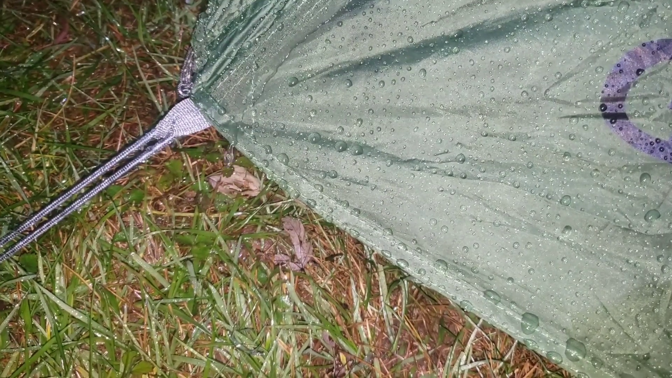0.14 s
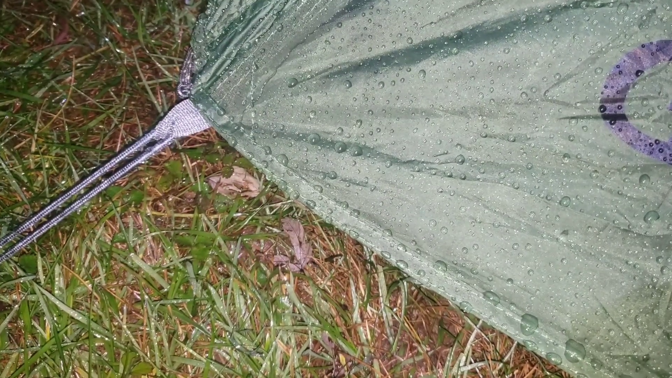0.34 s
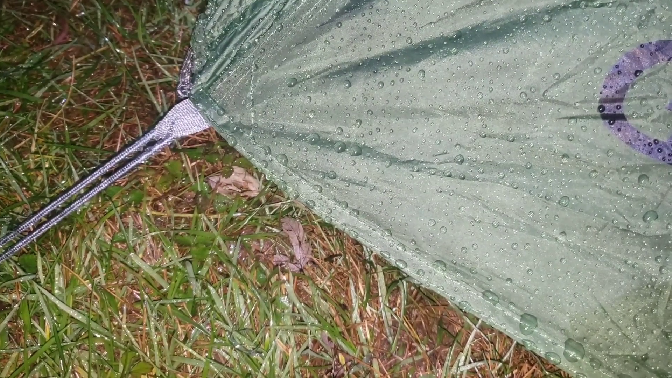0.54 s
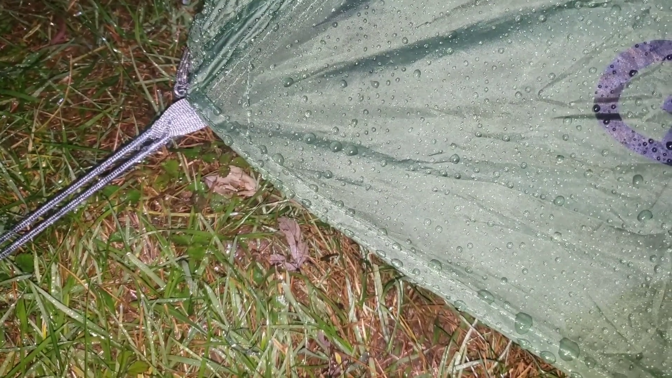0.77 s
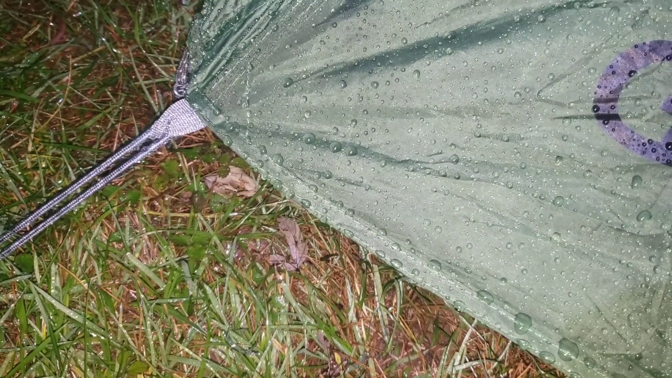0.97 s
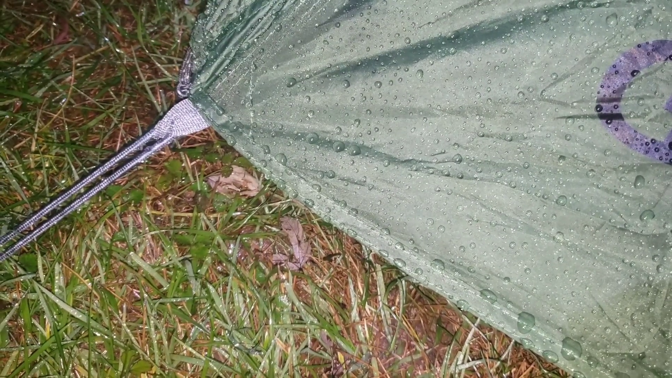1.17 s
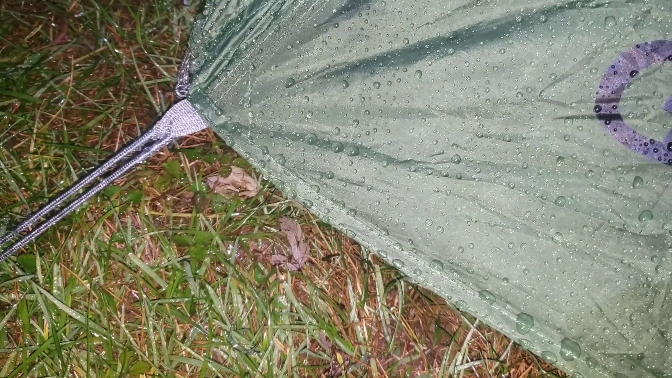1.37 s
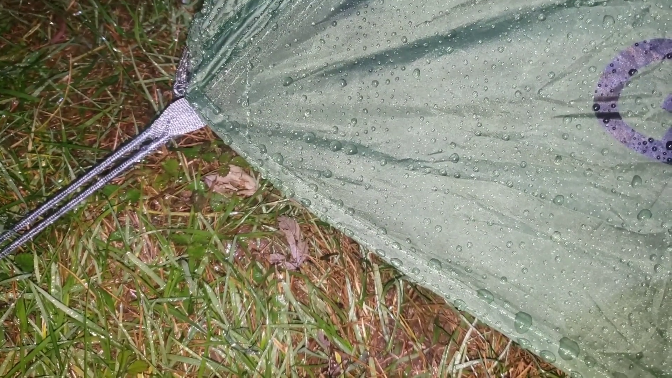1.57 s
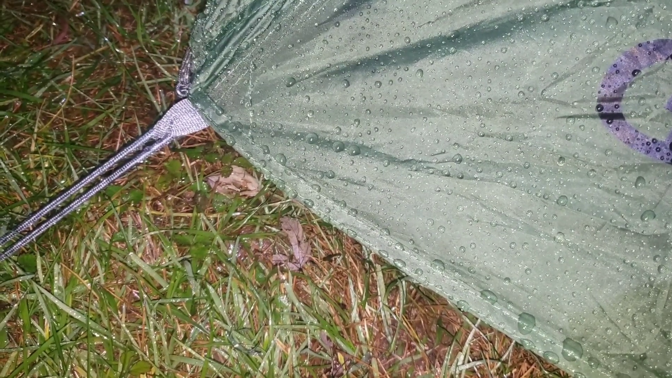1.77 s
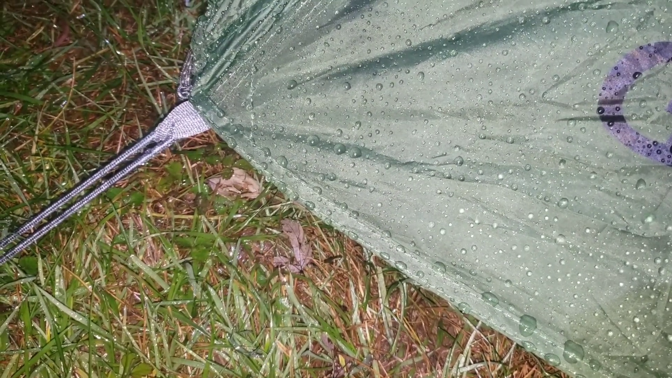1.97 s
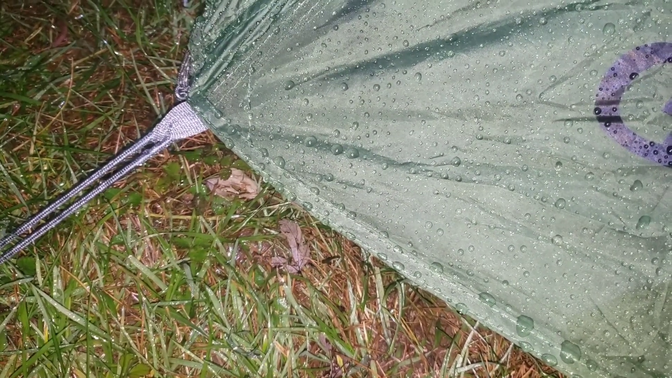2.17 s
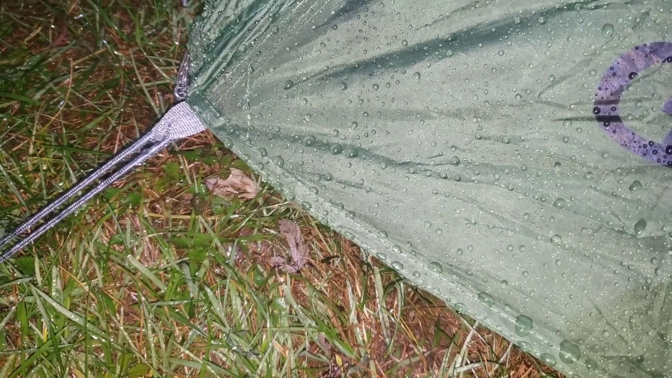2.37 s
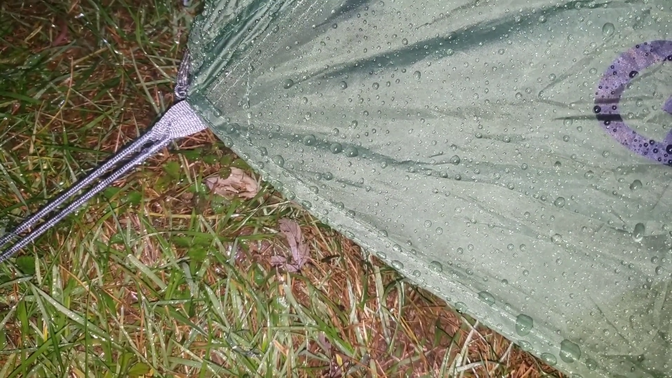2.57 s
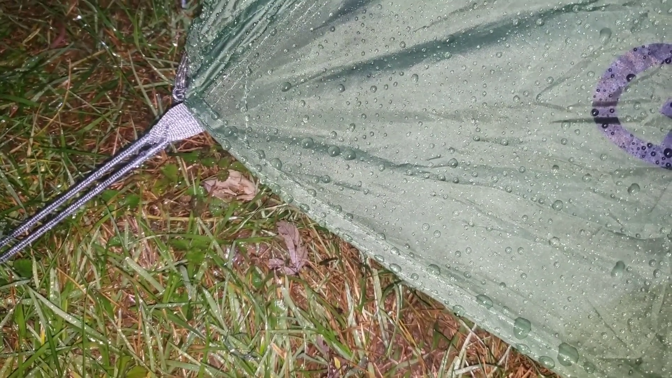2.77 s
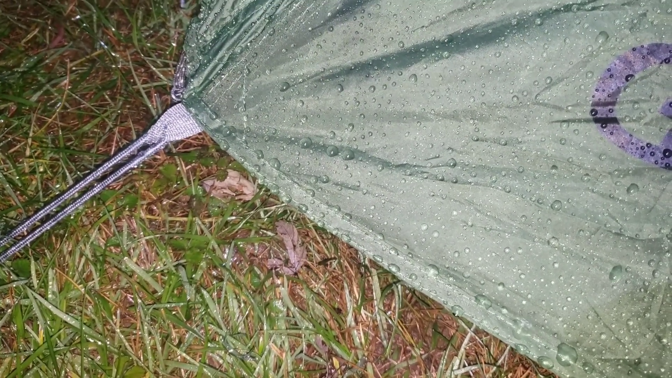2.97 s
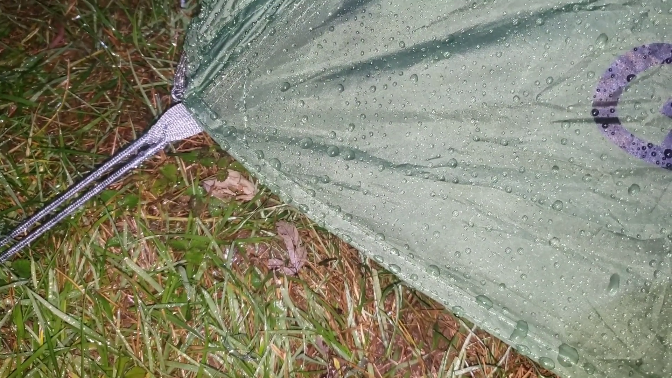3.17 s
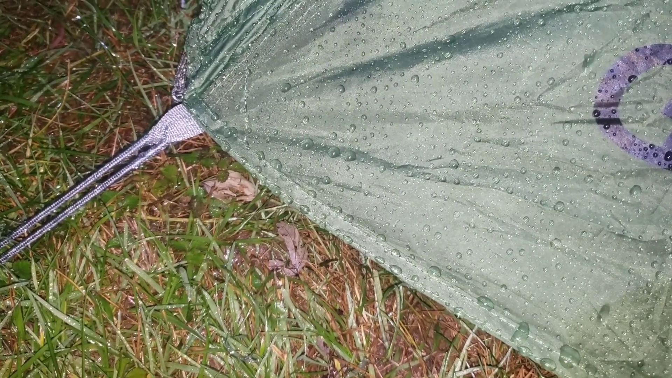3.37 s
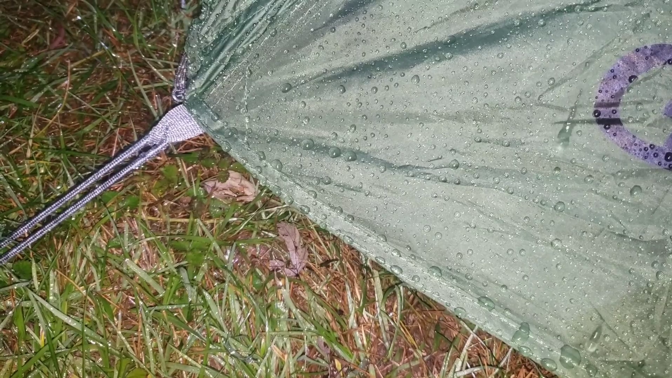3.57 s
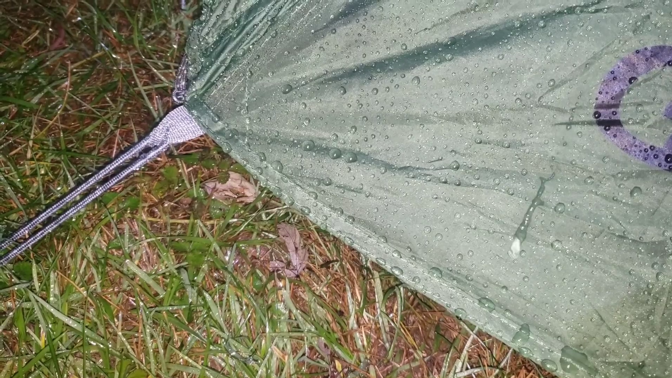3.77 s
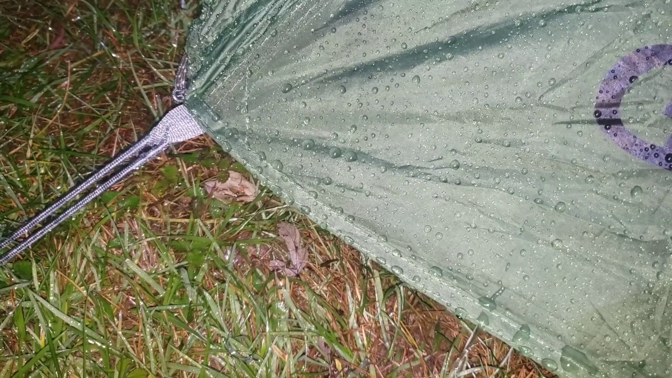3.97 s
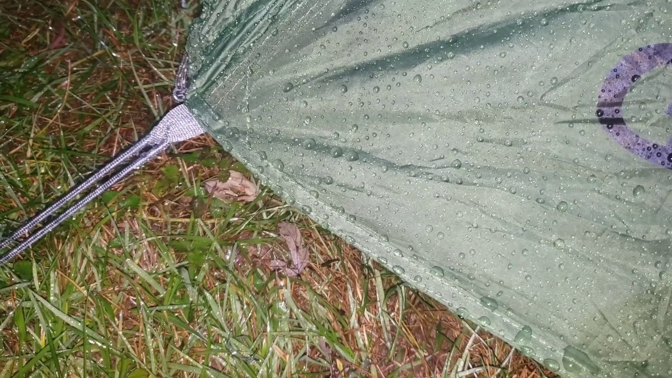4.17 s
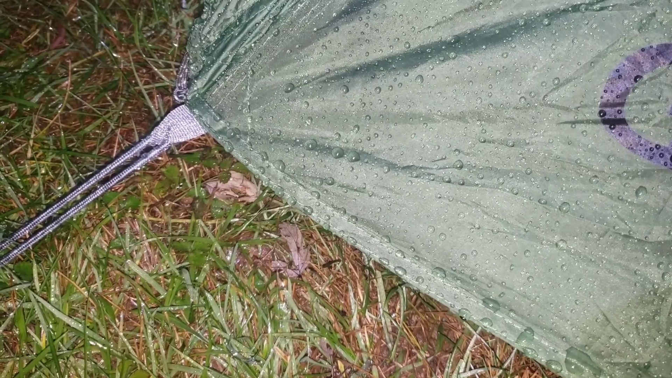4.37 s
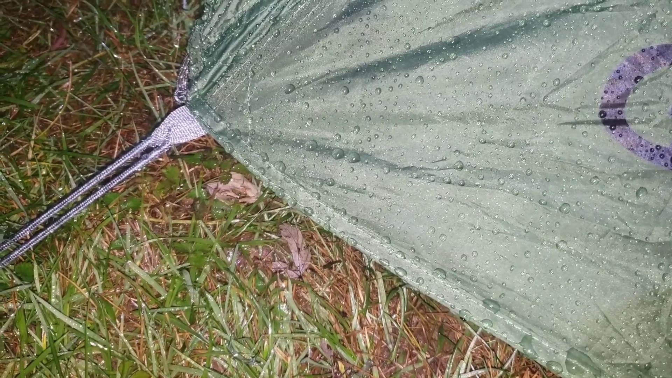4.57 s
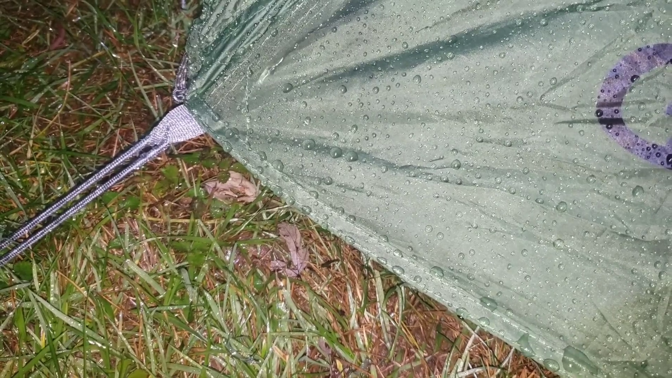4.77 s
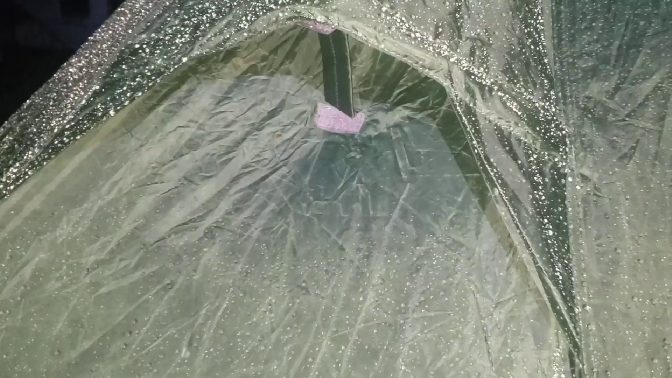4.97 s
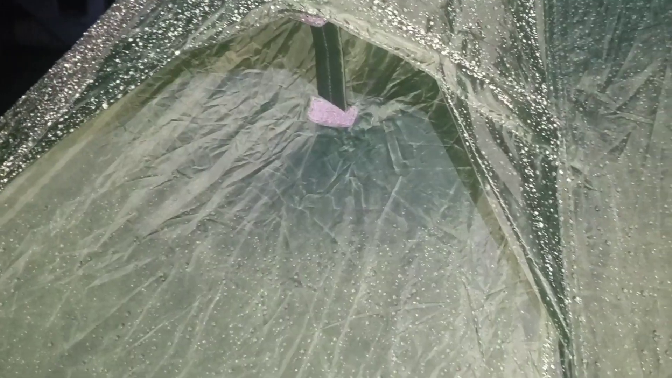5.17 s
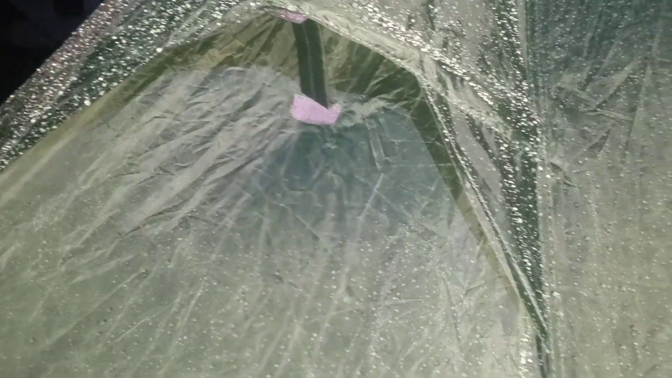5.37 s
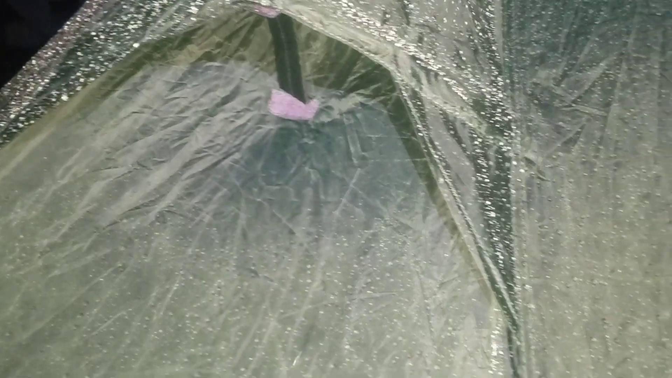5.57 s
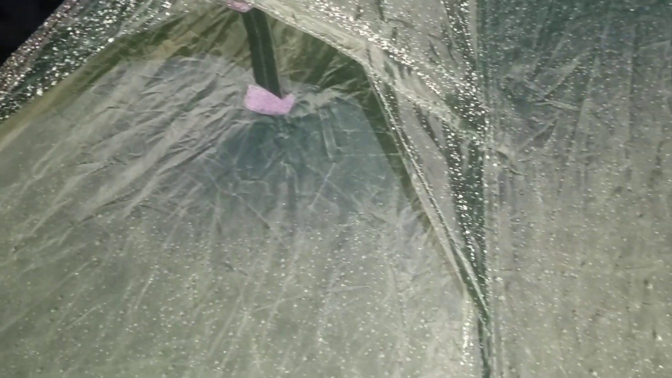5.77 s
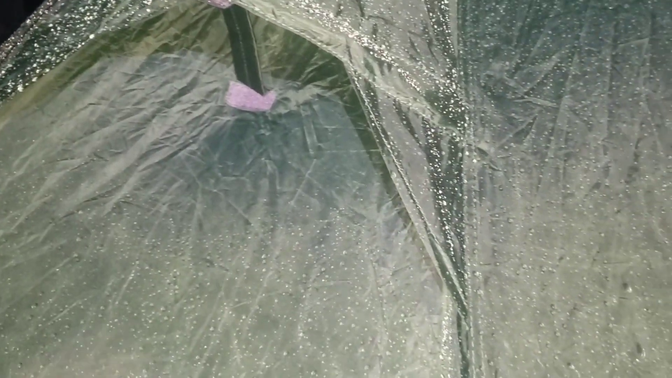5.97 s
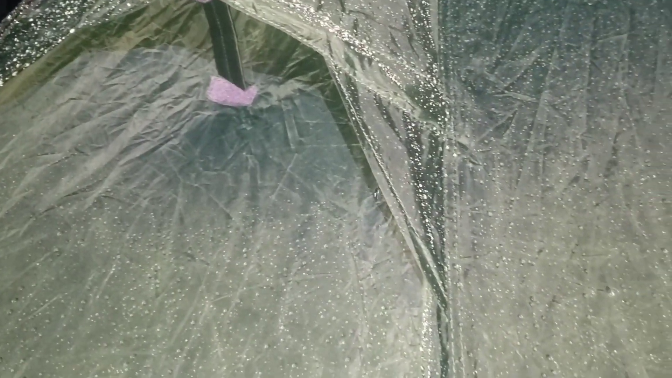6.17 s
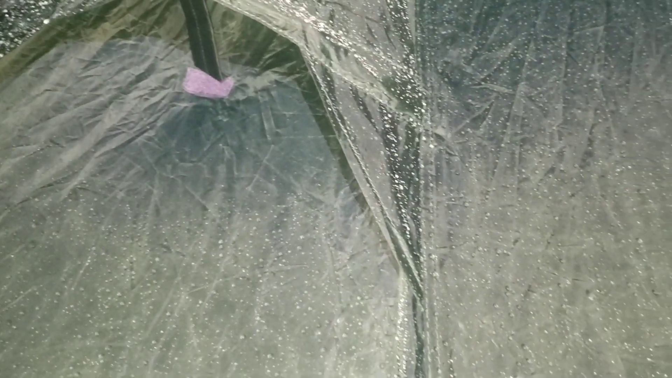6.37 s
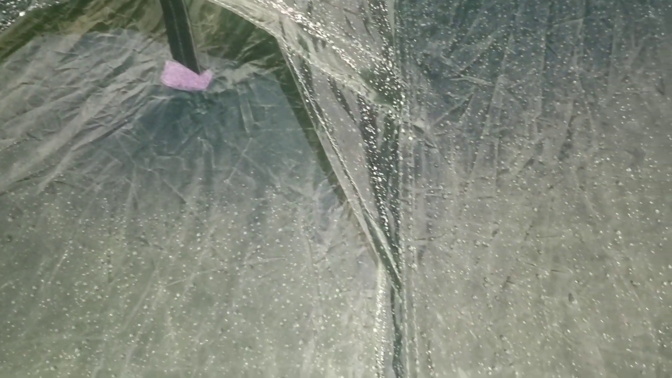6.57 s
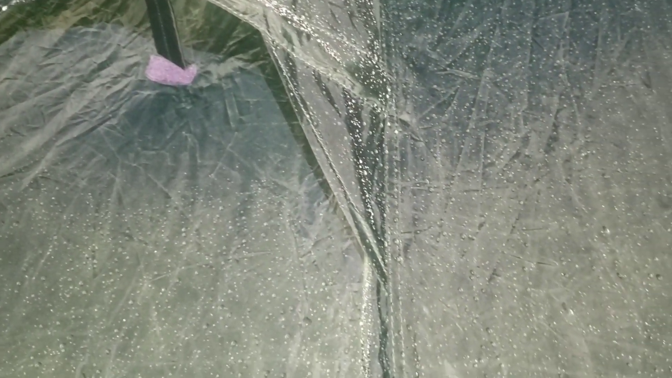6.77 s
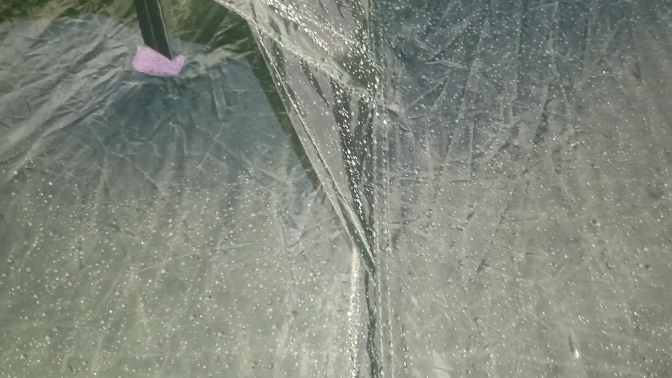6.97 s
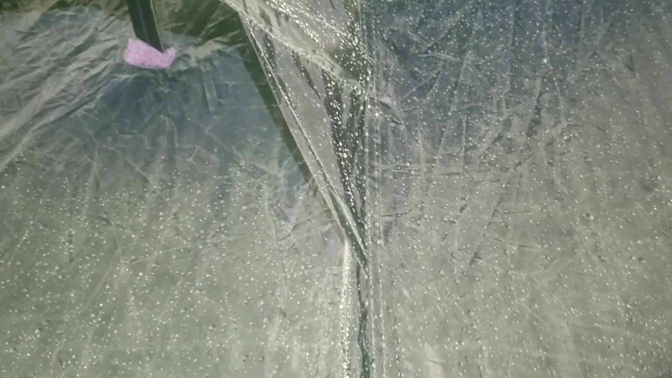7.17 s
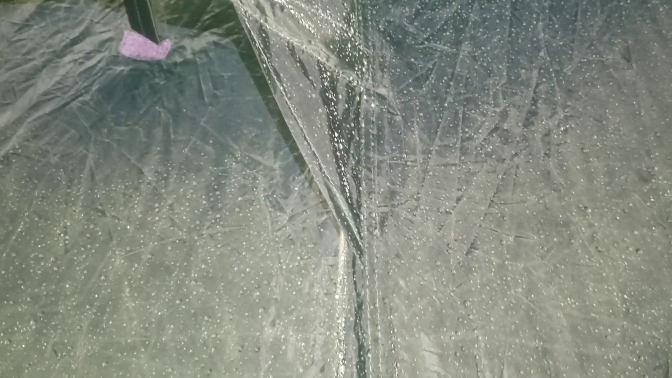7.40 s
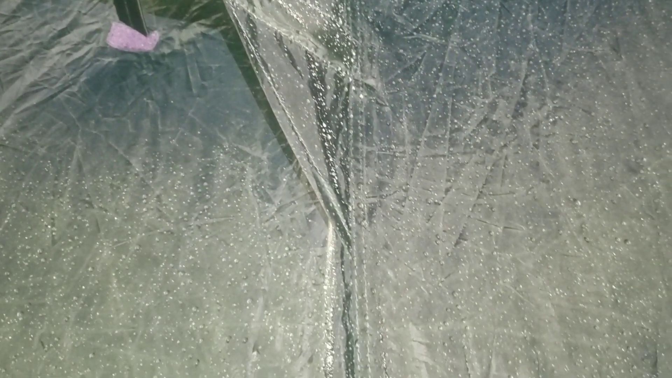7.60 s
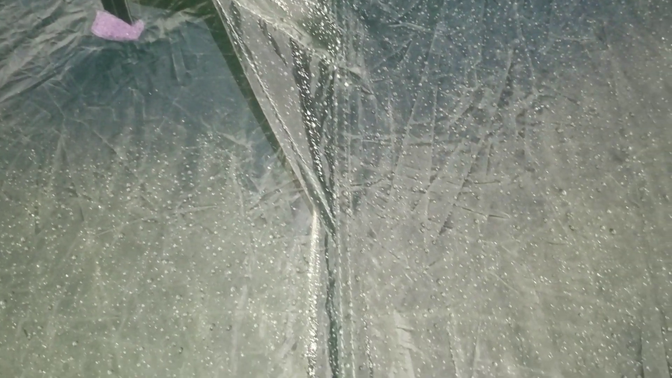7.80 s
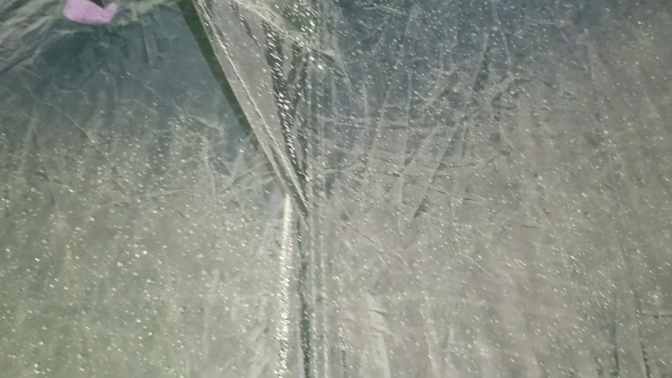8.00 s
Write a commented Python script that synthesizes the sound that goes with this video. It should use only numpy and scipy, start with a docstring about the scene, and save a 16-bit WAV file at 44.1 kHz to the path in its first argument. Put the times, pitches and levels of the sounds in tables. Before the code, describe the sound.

From the start, rain patters steadily on a taut tent outdoors, very close to the microphone and leaning to the right. Each drop makes a short snap with a hollow pock and a slight thud. Small drops come in loose flurries, while bigger ones land irregularly, several each second. The sharpest hits come at about 0.6 seconds and as a quick pair around 2 seconds. Behind them, distant rain makes an even hiss over a faint low rumble. At about 4.8 seconds the sound drops out for an instant. It returns at once, louder and busier, with stronger small drops and a fuller hiss. Heavy drops cluster between 5 and 6 seconds and again around 6.5 seconds, and the dense pattering carries on until the end at about 8 seconds.

```python
"""Night rain patters on a taut tent fly, close to a small camera with two microphones.
Each drop snaps the cloth, which rings with a hollow pock, rustles for a few ms and thuds a little longer.
Big drops land nearest, among flurries of small ones; distant rain hisses behind, over a faint rumble.
The sound drops out for an instant when the camera moves to a busier spot on the fly."""
import sys
import numpy as np
from scipy import signal
from scipy.fft import rfft, irfft
from scipy.io import wavfile

SR = 44100
rng = np.random.default_rng(int(sys.argv[2]) if len(sys.argv) > 2 else 0)


def inscribe(sig):
    """Save sig as 16-bit PCM at rate SR to the path in sys.argv[1].

    A 1-D sig is mono; a 2-D sig holds one channel per row.
    Samples are clipped to [-1, 1] before scaling.
    """
    pcm = np.round(np.clip(np.atleast_2d(sig).T, -1, 1) * 32767)
    wavfile.write(sys.argv[1], SR, pcm.astype(np.int16))


N = 354563

# Big drops close to the microphones; thud, knock, sizzle and splash are relative to the tick.
# start_s, tick_db, thud_db, knock_db, sizzle_db, splash_db, pock_hz
NEAR_DROPS = [(0.2191, -50.5, -1, -2.0, -9, -19, 890), (0.2648, -52, 1.5, -13.0, 4, -24.0, 635),
              (0.278, -49.0, -3, -4, -15, -11.5, 580.0), (0.3373, -72.5, 18, -1, 7, 4, 610.0),
              (0.4975, -48.5, 0, -4.0, -9, -26, 610.0), (0.5816, -38.5, -3.5, -5, -6, -38, 660),
              (0.615, -49.5, 5, 1, 1, -25.0, 585), (0.6552, -48, 5.0, 0, -4, -17, 660),
              (0.7169, -64, 4, 0, 9, 3.0, 850.0), (0.8971, -51.0, 4.5, -12.0, 2.5, -27, 484),
              (0.9836, -64, 14, 17, -11.0, -26, 850), (1.0184, -50.5, 3.5, -5, 1.5, -22.0, 616),
              (1.2705, -53.5, 3.5, -2, 1, -20, 490.0), (1.408, -63.5, 13.5, 3, -7, -26, 810),
              (1.5462, -61, 11, 1, 13.0, -13.0, 590.0), (1.8982, -47, 8, -16, -1, -29, 550),
              (1.906, -49, 3.5, -14, 0, -27.0, 620.0), (1.9839, -34.5, -0.5, -10, -24, -24.5, 600),
              (2.0098, -30.5, -2, -10, -5, -27.0, 560), (2.051, -44.5, -5, -3.0, -19.0, -34, 460.0),
              (2.176, -52, 7.5, -3, -1, -20, 530.0), (2.3139, -68.5, 8, 18.0, 0, -5.0, 820.0),
              (2.5267, -51, 3, -4, -7, -26, 430.0), (2.557, -58, -2, 4.5, -2, -11, 650.0),
              (2.578, -59.5, 15.5, -10.0, -6, -20.0, 685), (2.772, -54, 2, 3.5, -14, -23.0, 774),
              (2.9159, -48.5, -0.5, -0.5, -13, -19, 870), (3.0089, -45, -1, 4, 5, -18.0, 820),
              (3.256, -49, 6, -3, 11.5, -27, 586), (3.3975, -53, -2.5, -1.0, 0, -15, 880),
              (3.456, -44, -3.5, -10, 1.5, -21, 730), (3.5777, -56, 7.5, 4, -1, -21.0, 742),
              (3.626, -63, 14, 7, 2.0, -12, 660), (3.7841, -55.5, -1, -2.0, 1.0, -17, 640.0),
              (3.8345, -58, 7, -2, 4.0, -22.0, 540.0), (3.9916, -58.5, 7.5, -4, 3.5, -26.0, 584),
              (4.2598, -54.5, 11.0, -3, -0.5, -26, 550.0), (4.46, -57, -3, 3, 8, -37.0, 660.0),
              (4.6678, -48, 0, -6, -4.0, -28, 560), (4.7593, -41, -4.5, -10, -6.5, -26, 666),
              (4.871, -53, -7, -13.0, 0, -16, 497), (4.9126, -50.5, -2, 5.5, 11.5, -9.5, 990),
              (5.0955, -42.5, 1, -16.0, -10, -30, 460.0), (5.124, -49.5, -7.0, -1, -1, -26, 540.0),
              (5.1356, -60.5, 15.5, -4.0, 13.5, -16.0, 580), (5.1854, -45.5, 4, -2, -5.5, -22, 545),
              (5.2672, -43.5, -5, -5.5, -8, -29, 580.0), (5.291, -55.5, 13.5, -12, 4, -19.0, 580),
              (5.5972, -41, -2.5, -21, -23, -35, 420.0), (5.7552, -47.5, 2, 5.0, 2.5, -34, 606),
              (5.7683, -42, -0.5, -17, -13, -38, 540.0), (5.8333, -47.5, 2.5, -4, -22, -24, 630.0),
              (5.8778, -63.5, 17.5, 15.5, 13, -25.0, 670.0), (5.914, -58.5, 12, -6.0, 11.5, -28, 450.0),
              (5.9268, -40, 5.5, -15.0, -10, -32, 427), (6.2162, -45.5, 1.5, -7, -4, -33, 580),
              (6.326, -65, 19.5, -5, 16.5, -15, 580.0), (6.3613, -52, 5, -17, 2.0, -19, 516),
              (6.3793, -54.5, 16, 9.0, -11.0, -25.0, 660), (6.429, -51.5, 6, 2.5, -1, -26, 560.0),
              (6.441, -57, 15.5, -8.0, -12.0, -28.0, 587), (6.4994, -42, 2.5, -19, -11, -28.0, 520.0),
              (6.5268, -46.5, 1, 0, -10, -25.0, 640.0), (6.5613, -37.5, -5.0, -0.5, 0.5, -39, 680.0),
              (6.603, -48, 0, -1.0, -3.0, -20, 604), (6.6347, -57.5, 13, -12, 11.5, -25, 460.0),
              (6.6834, -52.5, 3.5, -5.0, 0, -27, 820), (6.9235, -50.5, 10.5, -1, -13, -25, 423),
              (6.994, -48.5, 2.0, -11, 3.5, -26, 540.0), (7.2164, -43, -5, -1, -15, -20, 730.0),
              (7.2193, -48, -9, -6, -14, -25.0, 600.0), (7.2238, -52, 6.5, -13, 1.0, -32.0, 600.0),
              (7.3461, -51.0, 9, -11.0, -6, -35, 520.0), (7.3688, -51, 7.5, 6, -25, -39, 780),
              (7.5437, -54, 18, 9, 8, -19, 523), (7.5874, -46, 3.5, -16, -4.0, -27, 624),
              (7.6125, -45.5, 4.5, 1, -8.0, -27, 510.0), (7.8297, -44.5, -2, -3, -18.0, -26.0, 830),
              (7.8353, -49, -15, -9, -8, -31, 670.0), (7.9164, -69, 10.5, -3, 5, 3.5, 674),
              (8.0247, -49, 8, -13, 5.5, -20, 460.0)]
# Rise and fall of the small drops and the distant rain: time_s, level_db
RAIN_LEVEL = [(0.0, -56), (0.83, -53.5), (1.01, -57.5), (1.75, -54), (4.78, -55.5), (4.85, -50),
              (6.16, -50.5), (6.4, -48.5), (7.88, -50.5), (8.04, -48)]
# Response of each microphone in its housing: frequency_hz, gain_db
LEFT_RESPONSE = [(30, -50), (50, -23), (100, -23.5), (170, -6), (400, -4.5), (1000, 6), (1750, -3),
                 (2300, -6), (4100, -1), (5600, -23.5), (7300, -27.5), (9200, -20.5), (12000, -23),
                 (15800, -38)]
RIGHT_RESPONSE = [(30, -27), (50, -36), (200, -5.5), (620, -0.06), (1500, -5), (2500, -2), (3050, -1),
                  (3250, -7.5), (3450, -8), (4700, -6), (6200, -22.5), (8500, -48.5), (9500, -43.5),
                  (12500, -38.5), (15800, -60)]
# The six bands of one impact: low_hz, high_hz, tail_over_snap_db, shared_fraction, gain_db
# (at a shared_fraction of 1 or more, both microphones hear the same tail)
BOOM_BAND = (48, 250, 9.2, 1.1, 34)
THUD_BAND = (237, 1035, 2.5, 0.94, 34)
KNOCK_BAND = (1098, 2383, -0.5, 0.36, 42.5)
TICK_BAND = (2587, 3398.5, -0.5, 0.44, 40.5)
SIZZLE_BAND = (3498, 6598, 0, 1.14, 42)
SPLASH_BAND = (8240, 20000, 0.43, 0.034, 63.6)
BANDS = (BOOM_BAND, THUD_BAND, KNOCK_BAND, TICK_BAND, SIZZLE_BAND, SPLASH_BAND)
# Decay of each band, as the wet cloth damps the treble first: t60_s
BAND_T60_S = (.050, .016, .012, .012, .010, .008)
# Slope of each band, gentle where they must add up to one sharp snap: filter_order
BAND_ORDERS = (2, 1, 1, 1, 1, 3)
# Furthest a small drop rises over its usual level in each band: cap_db
SMALL_DROP_CAP_DB = (14.5, 16, 11.9, 15.4, 20.1, 16.7)

MOVE_S = 4.8  # the camera moves; the four pairs below are (before, after)
LEFT_LAG_S = (.00032, .00003)  # how much later the left microphone hears a drop
PAN_DB = (-9.5, -8.5)  # left minus right
BOOM_TRIM_DB = (-1.5, -7.5)
SPRAY_DB = (3, -2)  # top treble of the small drops and distant rain


def near_drops():
    """The big drops that land nearest, each with its own weight of thud, knock, sizzle and splash."""
    start_s, tick_db, thud_db, knock_db, sizzle_db, splash_db, pock_hz = np.transpose(NEAR_DROPS)
    hardness_db = tick_db + thud_db + 49
    boom_db = thud_db + at_spot(start_s, BOOM_TRIM_DB) - 0.17 * hardness_db  # hard hits boom less
    colour_db = np.array([boom_db, thud_db, knock_db, np.zeros_like(start_s), sizzle_db, splash_db])
    sharpness = np.ones_like(start_s)
    return start_s, tick_db + colour_db, sharpness, pock_hz


def small_drops(count=1700, flurry_step_s=.045):
    """Drops over the whole fly, in loose flurries: many faint, few strong, each its own colour."""
    when, size_rank = rng.random((count, 2)).T
    start_s = when * N / SR
    knots_s = np.arange(0, N / SR + 1, flurry_step_s)
    flurry_db = 3.44 * np.interp(start_s, knots_s, rng.standard_normal(len(knots_s)))
    size_db = -5.2 * np.log(size_rank) + flurry_db
    boom, thud, knock, tick, sizzle, splash = rng.standard_normal((count, 6)).T
    colour_db = np.array([5.8 * thud + 6.3 * boom, 5.5 * thud, 6.0 * knock,
                          5.4 * tick, 5.5 * sizzle, 6.8 * splash])
    rise_db = np.minimum(size_db + colour_db, np.array(SMALL_DROP_CAP_DB)[:, None])
    usual_db = (-12.5 + at_spot(start_s, BOOM_TRIM_DB), -16.0, -18.5,
                -22.0, -22.5, -45.0 + at_spot(start_s, SPRAY_DB))
    rain_db = np.interp(start_s, *np.transpose(RAIN_LEVEL))
    band_db = [rain_db + usual + rise for usual, rise in zip(usual_db, rise_db)]
    sharpness = np.full(count, .85)  # further off, the snap softens and the rustle remains
    pock_hz = 620 * 2 ** (.3 * rng.standard_normal(count))
    return start_s, band_db, sharpness, pock_hz


def fly_impacts(start_s, band_db, sharpness, pock_hz, cloth_top_hz=8250):
    """Each drop snaps the fly inward and leaves it rustling and ringing, nearer one microphone."""
    lag_s = at_spot(start_s, LEFT_LAG_S) + .00015 * rng.standard_normal(len(start_s))
    arrival_s = np.array([start_s + lag_s / 2, start_s - lag_s / 2])
    onsets = np.clip((arrival_s * SR).astype(int), 0, N - 1)
    pan_db = at_spot(start_s, PAN_DB) + 2 * rng.standard_normal(len(start_s))
    side_db = np.array([pan_db, -pan_db]) / 2
    parts = []
    for row, t60_s, order, level_db in zip(BANDS, BAND_T60_S, BAND_ORDERS, band_db):
        low_hz, high_hz, tail_db, shared, gain_db = row
        strength = undb(level_db + gain_db + side_db)
        snap = band(impulses(onsets, strength * sharpness), low_hz, high_hz, order)
        tail = undb(tail_db) * cloth_rustle(impulses(onsets, strength ** 2), t60_s, shared)
        parts.append(band(tail, low_hz, high_hz, max(order, 2)) - snap)
    *cloth, splash = parts
    thud_strength = undb(band_db[1] + THUD_BAND[-1] + side_db)
    pock = cloth_pock(onsets, pock_hz, undb(-8) * thud_strength * sharpness)
    cloth_lowpass = signal.butter(4, cloth_top_hz, fs=SR, output="sos")
    return signal.sosfilt(cloth_lowpass, sum(cloth) + pock) + splash


def cloth_rustle(energy, t60_s, shared):
    """Each snap leaves its energy in the cloth, where it leaks away as noise."""
    retained = undb(-60 / (t60_s * SR)) ** 2
    stored = signal.lfilter([1 - retained], [1, -retained], energy)
    shared = np.clip(shared, 0, 1)
    common = np.sqrt(shared) * at_both_mics(rng.standard_normal(N))
    separate = np.sqrt(1 - shared) * rng.standard_normal((2, N))
    return np.sqrt(stored) * (common + separate)


def cloth_pock(onsets, pitch_hz, strength, decay_s=.0014, length=512):
    """Each drop rings its patch of taut cloth for a cycle or two, at a pitch of its own."""
    t = np.arange(length) / SR
    ring = -np.sin(2 * np.pi * pitch_hz[:, None] * t) * np.exp(-t / decay_s)
    ring /= np.linalg.norm(ring, axis=1, keepdims=True)
    return impulses(onsets[..., None] + np.arange(length), strength[..., None] * ring)


def distant_rain():
    """Rain on grass and further cloth merges into a hiss; both microphones share its low end."""
    t = np.arange(N) / SR
    level_db = np.interp(t, *np.transpose(RAIN_LEVEL)) + 7.0
    pan_db = at_spot(t, PAN_DB)
    low = band(at_both_mics(rng.standard_normal(N)), 96, 654)
    hiss = band(rng.standard_normal((2, N)), 657, 8900)
    spray = undb(at_spot(t, SPRAY_DB) - 0.3) * band(rng.standard_normal((2, N)), 9100, 17000)
    return undb(level_db + np.array([pan_db, -pan_db]) / 2) * (low + hiss + spray)


def rumble():
    """A faint steady rumble, different at each microphone."""
    return undb(-41) * band(rng.standard_normal((2, N)), 16, 87)


def microphone(x, response, size=4096):
    """One housed microphone colours the sound: a minimum-phase filter, built from the cepstrum."""
    frequency_hz, gain_db = np.transpose(response)
    grid_hz = np.maximum(np.arange(size // 2 + 1) * SR / size, 1)
    gain = undb(np.interp(np.log(grid_hz), np.log(frequency_hz), gain_db))
    cepstrum = irfft(np.log(gain))
    cepstrum[1:size // 2] *= 2
    cepstrum[size // 2 + 1:] = 0
    return signal.oaconvolve(x, irfft(np.exp(rfft(cepstrum))))[:N]


def at_both_mics(x):
    """One sound at both microphones, the left a little late."""
    delayed = [np.roll(x, int(lag_s * SR)) for lag_s in LEFT_LAG_S]
    return np.array([at_spot(np.arange(N) / SR, delayed), x])


def at_spot(time_s, pair):
    """The first of a pair before the camera moves, the second after."""
    return np.where(time_s < MOVE_S, *pair)


def impulses(samples, weights):
    """Weights summed at their sample positions, one track for each microphone."""
    return np.array([np.bincount(at.ravel(), w.ravel(), N)[:N] for at, w in zip(samples, weights)])


def band(x, low_hz, high_hz, order=2):
    return signal.sosfilt(signal.butter(order, [low_hz, high_hz], "bandpass", fs=SR, output="sos"), x)


def undb(db):
    return 10 ** (np.asarray(db) / 20)


def scene():
    """Big and small drops on the fly up close, distant rain and rumble behind."""
    drops = [np.concatenate(pair, axis=-1) for pair in zip(near_drops(), small_drops())]
    return fly_impacts(*drops) + distant_rain() + rumble()


def record(dry):
    """Two differently housed microphones, a brief dropout at the move, and the top cut off."""
    fade_out_s, gap_s, fade_in_s, gap_db, top_hz = .003, .022, .012, -42, 16000
    heard = np.array([microphone(dry[0], LEFT_RESPONSE), microphone(dry[1], RIGHT_RESPONSE)])
    corners_s = MOVE_S + np.array([-fade_out_s, 0, gap_s, gap_s + fade_in_s])
    dropout = np.interp(np.arange(N) / SR, corners_s, undb([0, gap_db, gap_db, 0]))
    return signal.sosfilt(signal.ellip(8, .2, 70, top_hz, fs=SR, output="sos"), heard * dropout)


dry = scene()
out = record(dry)
inscribe(out)
```